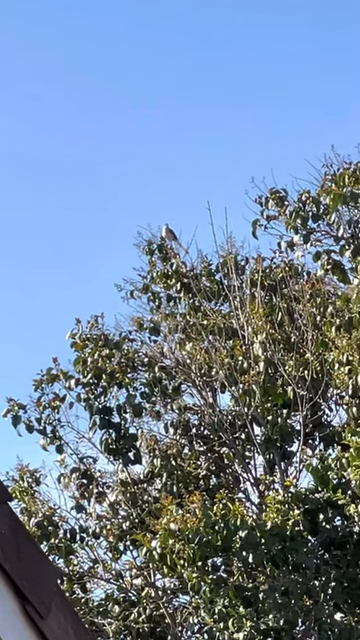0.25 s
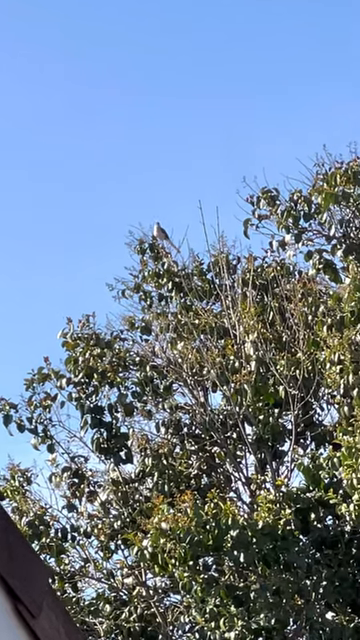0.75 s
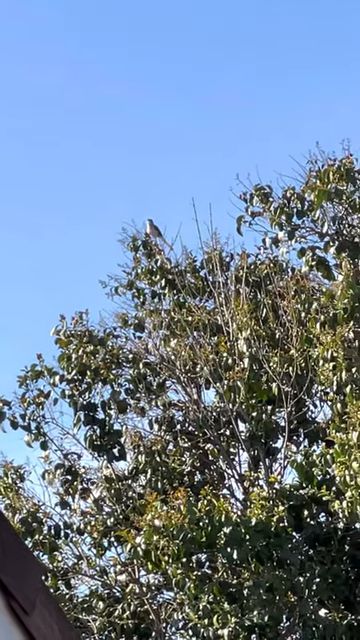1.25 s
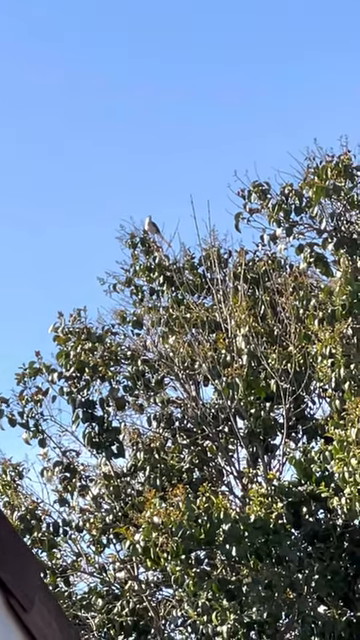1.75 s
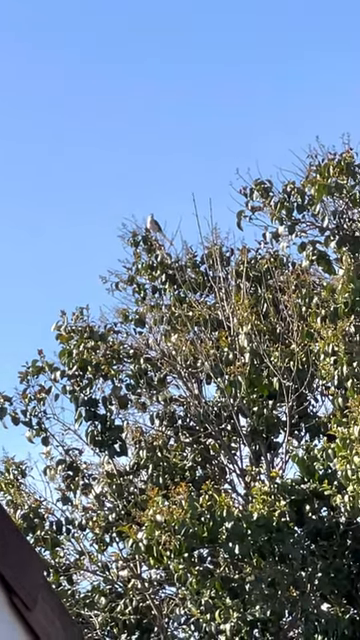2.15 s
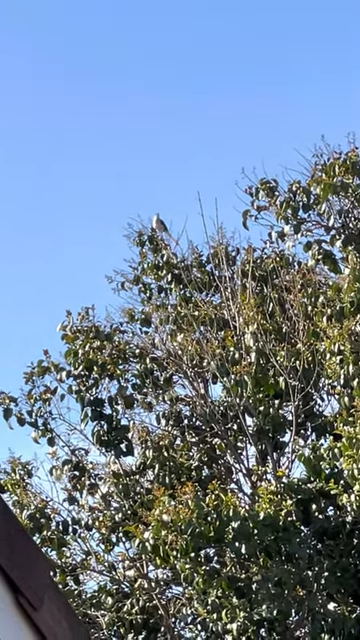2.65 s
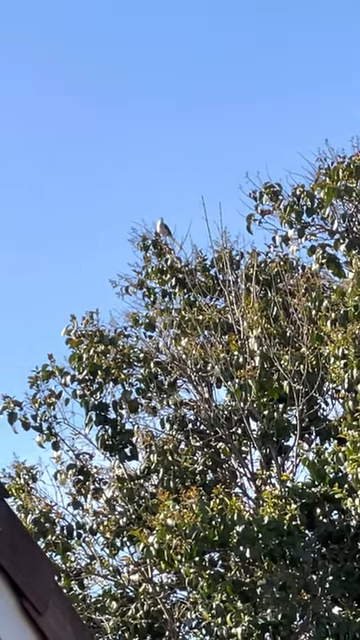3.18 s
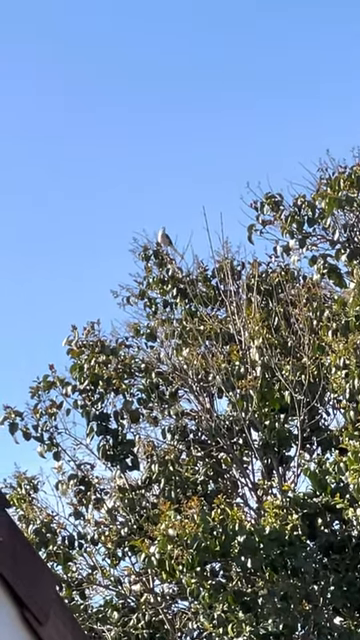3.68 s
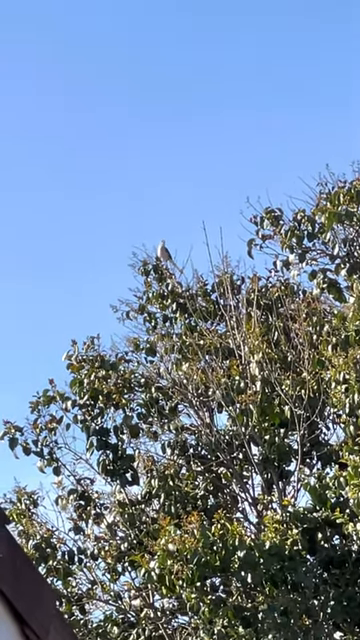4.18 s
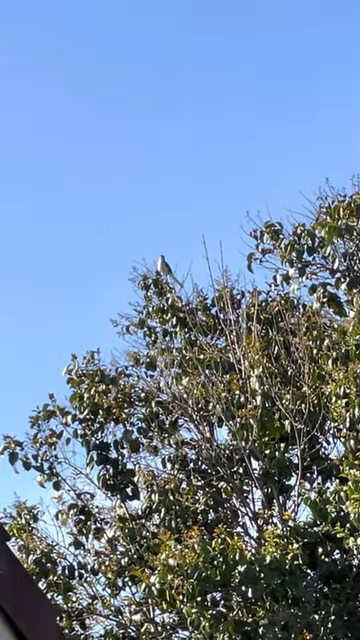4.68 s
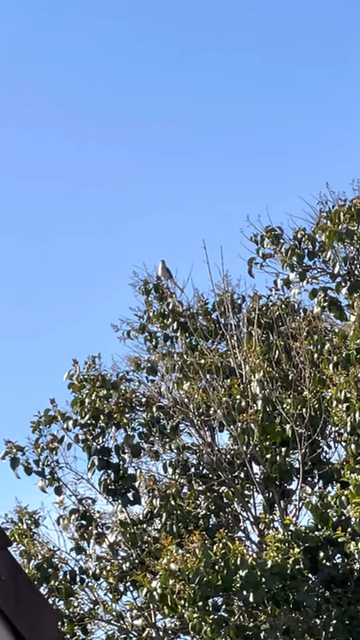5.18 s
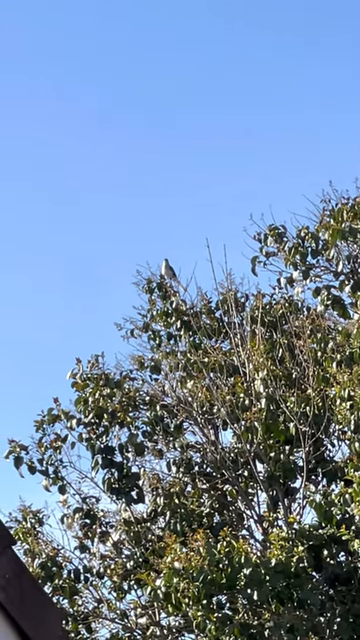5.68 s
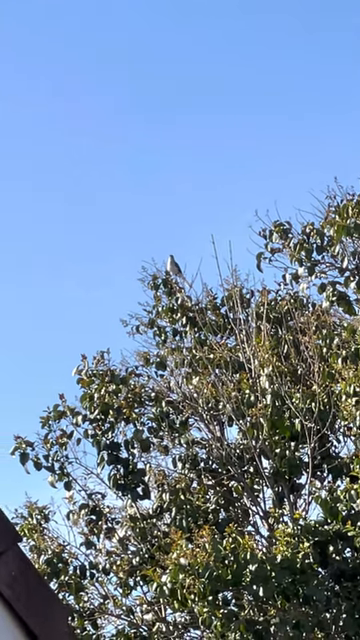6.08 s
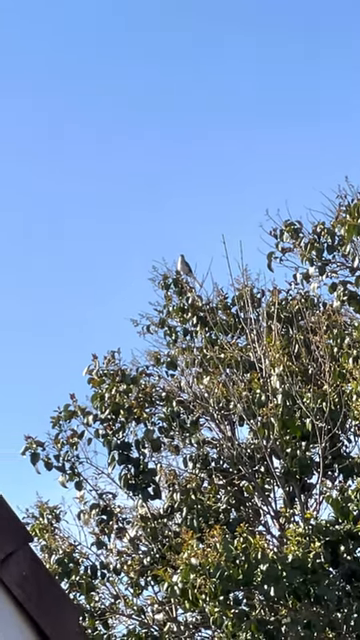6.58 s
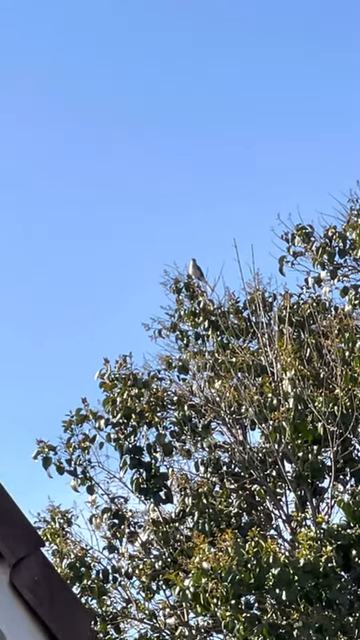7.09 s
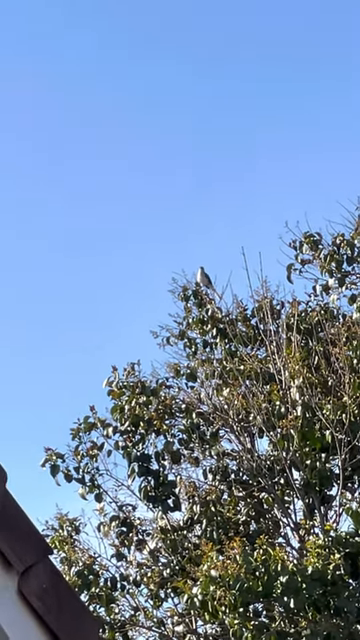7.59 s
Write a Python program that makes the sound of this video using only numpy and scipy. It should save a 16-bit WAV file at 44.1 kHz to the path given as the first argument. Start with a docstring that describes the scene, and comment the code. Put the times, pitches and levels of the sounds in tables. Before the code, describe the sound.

Outdoors, one bird buzzes nasally, mews five times with long pauses, then chucks sharply twice, while farther birds trill and a dove coos softly.

```python
"""Songbird on a treetop over a town

A near bird gives the end of one nasal buzz and a whole one, five mews that rise fast and fall, and two
harsh chucks: stacks of partials through a throat resonance, and grainy noise bands. Walls and trees answer.
A farther bird's two trills each end on a throbbing churr, others chirp as sliding whistles and a dove coos,
over filtered noise for traffic, distant birds and hush. Two close microphone ports hear the directional
sounds in step in the bass and out of step in the treble."""
import sys
import numpy as np
from scipy import signal
from scipy.fft import rfft, irfft, next_fast_len
from scipy.io import wavfile
from scipy.ndimage import map_coordinates

SR = 44100
rng = np.random.default_rng(int(sys.argv[2]) if len(sys.argv) > 2 else 0)


def file_out(sig):
    """Save sig as 16-bit WAV at sys.argv[1]."""
    # one column per channel
    cols = np.atleast_2d(sig).T
    # limit, then scale
    lim = np.clip(cols, -1, 1)
    pcm = np.round(lim * 32767).astype(np.int16)
    wavfile.write(sys.argv[1], SR, pcm)


def how_loud(loudness_db):
    """Turn decibels into a plain amplitude multiplier (0 dB gives 1, 20 dB gives 10)."""
    steps = np.asarray(loudness_db, float) / 20
    return 10 ** steps


N = 345744  # samples


def unit(x):
    """Normalisation: a signal divided by its rms has unit power."""
    return x / np.sqrt(np.mean(x ** 2) + 1e-20)


def along(points, hz):
    """Logarithmic frequency scale: (Hz, value) points are joined by lines over log frequency."""
    f, v = np.transpose(points)
    return np.interp(np.log(hz + 1), np.log(f + 1), v)


def span(rows):
    """Piecewise linear control: first sample, times, 6 ms edge fades and a curve for each column."""
    s, *cols = np.transpose(rows)
    start = round(s[0] * SR)
    t = np.arange(start, min(N, round(s[-1] * SR))) / SR
    edge = np.clip(np.minimum(t - s[0], s[-1] - t) / .006, 0, 1)
    return start, t, edge, [np.interp(t, s, c) for c in cols]


def wobble(n, rate):
    """Band-limited fluctuation: a spline through random knots, rate of them a second."""
    knots = rng.standard_normal(int(n * rate / SR) + 4)
    return map_coordinates(knots, [np.arange(n) * rate / SR])


def tone(hz):
    """Frequency modulation: phase is the running sum of frequency; a sine of rms 1."""
    return np.sqrt(2) * np.sin(2 * np.pi * (np.cumsum(hz) / SR + rng.random()))


def filtered(x, response):
    """Linear filtering: the spectrum is multiplied by a complex response of frequency."""
    m = next_fast_len(x.shape[-1] + 8192)
    spectrum = rfft(x, m) * response(np.fft.rfftfreq(m, 1 / SR))
    return irfft(spectrum, m)[..., :x.shape[-1]]


def hiss(spectrum, n):
    """Coloured noise: white noise shaped by a spectral density, then scaled to rms 1."""
    white = rng.standard_normal(n)
    return unit(filtered(white, lambda hz: how_loud(along(spectrum, hz))))


def band(hz, width_hz):
    """Narrow-band noise: a jittered carrier times a random envelope whose swings saturate; rms near 1."""
    carrier = tone(hz + .1 * width_hz * wobble(len(hz), 300))
    return carrier * 2.4 * np.tanh(wobble(len(hz), width_hz) / 2)


def throat(pitch, throat_hz, sharpness):
    """Resonance: dB that two equal second-order low-pass resonators in series give partials 2 to 5."""
    r = np.arange(2, 6)[:, None] * pitch / throat_hz
    return -20 * np.log10((1 - r ** 2) ** 2 + (r / sharpness) ** 2)


def nasal(pitch, low_db, upper_db, upper_hz, shelf, top_db, top_hz, breath):
    """Source and filter: partials without their fundamental; breath smears each into narrow noise."""
    k = np.arange(2, 28)[:, None]
    n = len(pitch)
    hz = k * pitch * (1 + 0.0022 * wobble(n, 70))
    # the open beak favours one band above partial 5
    beak_band = 1 / (1 + ((hz - upper_hz) / 500) ** 2)
    upper = (k > 5) * (beak_band + shelf / (1 + (hz / 8700) ** 30))
    top = np.exp(-((hz - top_hz) / 1300) ** 2)
    gain = how_loud(upper_db) * upper / np.linalg.norm(upper, axis=0)
    gain += how_loud(top_db + 3.5) * top / np.linalg.norm(top, axis=0)
    gain[:4] = how_loud(np.array(low_db))  # partials 2 to 5 follow the throat
    # each overtone wavers on its own
    gain[1:] *= how_loud(1.68 * np.array([wobble(n, 26.7) for _ in k[1:]]))
    share = np.clip(breath * (hz / 2500) ** 2, 0, 1)  # high partials are rougher
    share[0] *= .04  # the lowest line stays nearly a clean whistle
    rough = np.array([wobble(n, 500) for _ in k])
    sines = np.array([tone(f) for f in hz])
    partials = gain * sines * (np.sqrt(1 - share) + np.sqrt(share) * rough)
    return np.sum(partials * (hz < SR / 2.2), axis=0)


def buzzes():
    """Formant filtering: a wide throat and an open beak colour a nasal stack of partials."""
    # Nasal buzzes, the first only the fading end of one. Each row: time in seconds, pitch in Hz,
    # effort in dB, level of the treble in dB, throat resonance in Hz.
    buzz_glides = [
        [(0, 893, -63, -61, 3960), (.02, 884, -81.5, -81, 4000), (.15, 914, -100, -92, 4000)],
        [(.692, 693, -91, -88, 4400), (.706, 655, -64, -53, 4530), (.722, 753, -58.5, -48.5, 4430),
         (.745, 815, -69, -44.5, 4300), (.8, 837, -61, -48, 4000), (.868, 847, -62.5, -43.5, 3970),
         (.93, 867, -57.5, -52.5, 4100), (1.08, 881.7, -64, -55.5, 4100), (1.16, 891, -64.5, -62.5, 4097),
         (1.21, 905, -70.5, -79, 3770), (1.24, 922, -92, -91, 3794)],
    ]
    source_db, throat_q = [-18.5, -6.5, -7.5, -4], 2.07  # partials 2-5 at the syrinx; a wide throat
    out = np.zeros(N)
    for rows in buzz_glides:
        i, t, edge, (pitch, effort_db, upper_db, throat_hz) = span(rows)
        age = t - t[0]
        low_db = effort_db + np.c_[source_db] + throat(pitch, throat_hz, throat_q)
        # rough onset, clear middle, hoarse end
        breath = 0.58 * np.exp(-age / 0.027) + 0.011 + 0.15 * np.clip((age - .33) / 0.24, 0, 1)
        upper_hz = np.interp(age, (.12, .22), (5570, 5110))  # the favoured band sinks
        top_db = upper_db - 17.5 - 12 * age  # the top tires first
        voice = nasal(pitch, low_db, upper_db, upper_hz, 0.27, top_db, 12860, breath)
        out[i:i + len(t)] += edge * voice
    return out


def mews():
    """Beating of two sources: the second side of the syrinx trails in pitch and parts on the fall."""
    # Mews. Each row: start, crest, beak closed and end in seconds, treble in dB,
    # how much higher the throat opens in Hz.
    calls = [(1.369, 1.523, 1.67, 1.84, -66.5, 93), (2.061, 2.203, 2.37, 2.46, -66.5, 147),
             (3.549, 3.689, 3.917, 4.01, -68.5, -6), (4.371, 4.505, 4.65, 4.835, -67.5, -100),
             (5.053, 5.186, 5.4, 5.455, -68, -100)]
    # The shape of every mew. Each row: stage (0 start, 1 crest, 2 closed, 3 end), throat resonance in Hz
    # before the opening is added, its sharpness Q, treble in dB and top partials in dB, both re the mew.
    contour = [(0, 2550, 2.6, -25, -41.5), (.22, 2690, 0.82, -16.5, -24.5), (.5, 2920, 2.5, -2.5, -12.5),
               (.8, 2650, 3.3, -1, -11), (1, 2510, 4.2, -7.5, -12.5), (1.301, 2166, 2.4, -11.5, -14),
               (1.501, 1700, 3.9, -20, -25.5), (2, 1527, 4, -17.5, -27.5), (2.35, 1462, 4, -22, -38),
               (3.001, 1360, 4.2, -36.5, -45)]
    # Voice of each mew. Each row: time in seconds, pitch in Hz, effort in dB.
    glides = [
        [(1.37, 602, -93.5), (1.4, 639, -62.5), (1.44, 703, -60.5), (1.475, 754.7, -66.5), (1.55, 786.6, -63),
         (1.6, 764.5, -69), (1.65, 753, -72), (1.7, 706, -76), (1.75, 670, -83.5), (1.84, 642, -97)],
        [(2.06, 567.4, -81), (2.1, 648, -64.5), (2.14, 695, -61.5), (2.17, 759, -66), (2.2, 772.6, -63.5),
         (2.25, 778.6, -66), (2.29, 750, -69), (2.335, 742, -69), (2.39, 695, -76), (2.46, 645, -100)],
        [(3.55, 607, -87), (3.585, 640, -62), (3.62, 708, -63), (3.66, 772.5, -63.5), (3.7, 790.4, -64.5),
         (3.75, 797.4, -70.5), (3.8, 765, -66.5), (3.84, 754, -69.5), (3.92, 701.5, -78), (3.97, 688, -81),
         (4.01, 655, -98)],
        [(4.37, 587, -89), (4.4, 662, -63), (4.44, 718, -63), (4.48, 778.5, -62), (4.52, 786.6, -63.5),
         (4.59, 760.6, -70), (4.65, 771, -69), (4.71, 719, -74), (4.79, 678, -81), (4.835, 659, -99)],
        [(5.05, 572, -78.5), (5.09, 633, -67.5), (5.13, 686, -67), (5.16, 744, -63.5), (5.2, 779, -61),
         (5.225, 779, -66.5), (5.27, 755, -65), (5.33, 731, -70.5), (5.39, 684, -77), (5.425, 664, -85),
         (5.455, 690, -100)],
    ]
    # Source levels of partials 2 to 5 at the syrinx, in dB re effort.
    source_db = [-2, -2, -2.5, 4]
    second_lag_s, octave_db = 0.11, -22.5
    out = np.zeros(N)
    stage, *shape = np.transpose(contour)
    for (*times, db, open_hz), glide in zip(calls, glides):
        stage_times = np.interp(stage, range(len(times)), times)
        i, t, edge, curves = span(np.transpose([stage_times, stage, *shape]))
        now, throat_hz, sharpness, upper_db, top_db = curves
        s, *controls = np.transpose(glide)
        pitch, effort_db = [np.interp(t, s, c) for c in controls]
        age = t - t[0]
        throat_hz = throat_hz + open_hz * np.clip(2 * (1 - now), 0, 1)
        low_db = effort_db + np.c_[source_db] + throat(pitch, throat_hz, sharpness)
        # with the beak closed the whistle keeps its own octave
        low_db[2] = np.maximum(low_db[2], low_db[0] + octave_db)
        top_hz = np.interp(age, [.05, .25], [15000, 13000])  # the beak closes and the top band sinks
        # the voice sets in rough, clears, and frays at the end
        breath = 0.15 * np.exp(-age / 0.078) + 0.01 + 0.36 * np.clip((age - .2) / 0.059, 0, 1)
        voice = nasal(pitch, low_db, db + upper_db, 5460, 0.39, db + top_db, top_hz, breath)
        trailing = 2 * np.interp(t - second_lag_s, t, pitch)
        # heard only once the two sides drift apart on the fall
        parted = np.clip((trailing - 2 * pitch - 35) / 50, 0, 1)
        second = tone(trailing) + 0.32 * tone(4 * pitch - trailing)  # with its mirror below the main line
        out[i:i + len(t)] += edge * (voice + how_loud(low_db[0] - 4.0) * parted * second)
    return out


def chucks():
    """Noise excitation: a sinking throat band, a fixed beak band and a broad rasp burst together."""
    # Chucks. Each row: time in seconds, level in dB, stretch of time as a factor, extra rasp in dB.
    calls = [(6.595, -44.5, 1.1, -3), (7.604, -45, 1.05, 2)]
    # The shape of every chuck. Each row: age in seconds before stretching, sinking throat band in Hz,
    # its level in dB, level of the 3.7 kHz beak band in dB, treble rasp in dB before the extra.
    contour = [(-.006, 2970, -52, -36, -39), (.002, 2916, -16, -15, -18), (.01, 2820, -5, -5.5, -4),
               (0.021, 2737, 1.8, -2, -5), (.033, 2480, 1, -9, -17), (.048, 2220, -5, -22, -26.5),
               (.064, 2090, -22, -36, -38)]
    # Rasp spectrum before scaling to rms 1. Each row: frequency in Hz, density in dB per Hz.
    rasp_spectrum = [(2530, -29), (4300, -20), (5160, -1), (5540, -11), (6330, -10), (6900, -17.5),
                     (7680, -14), (9950, -9), (11300, -20), (15500, -32)]
    out = np.zeros(N)
    age, *shape = np.transpose(contour)
    for s, db, stretch, extra_db in calls:
        i, t, edge, curves = span(np.transpose([s + stretch * age, *shape]))
        throat_hz, throat_db, beak_db, rasp_db = curves
        low = how_loud(throat_db) * band(throat_hz, 739)
        beak = how_loud(beak_db) * band(3700 + 0 * t, 600)
        rasp = how_loud(rasp_db + extra_db) * hiss(rasp_spectrum, len(t))
        out[i:i + len(t)] += edge * how_loud(db) * (low + beak + rasp)
    return out


def songbird():
    """Superposition: the near bird's buzzes, mews and chucks add up."""
    return buzzes() + mews() + chucks()


def far_birds():
    """Frequency glides: trill strokes and single notes are whistles with unsteady pitch."""
    # Trills of the far bird. Each row: first stroke in seconds, number of strokes, strokes a second,
    # level in dB.
    trills = [(1.81, 9, 11.4, -68.5), (5.725, 9, 11.35, -67.5)]
    # One stroke: two slides, with a held note that starts just after the low one and lasts until the
    # high one ends. Each row: delay in seconds, length in seconds, starting pitch in Hz,
    # final pitch in Hz, level in dB re the trill.
    stroke = [(0, 0.021, 3850, 2650, 0.5), (0.051, 0.021, 6200, 5600, -4),
              (0.0062, 0.065, 5720, 5640, -9.5)]
    # A held note around the first stroke, begun before it. Columns as for the stroke.
    lead_in = [(-0.09, 0.12, 5580, 5625, -11.5)]
    # Single far notes. Each row: start in seconds, length in seconds, starting pitch in Hz,
    # final pitch in Hz, level in dB.
    single_notes = [(0.195, .07, 4520, 4160, -87), (.39, .05, 3970, 3800, -86),
                    (0.453, .1, 2610, 2540, -85), (2.37, 0.018, 2850, 4400, -61.5),
                    (2.396, 0.014, 4500, 2760, -60), (2.532, 0.029, 1864, 1890, -76),
                    (2.571, 0.0078, 3950, 2410, -63), (2.69, 0.071, 3500, 4000, -74.5),
                    (2.814, 0.024, 4520, 2920, -65), (2.999, 0.016, 3050, 3100, -77),
                    (3.0, 0.045, 7200, 7650, -95), (3.228, .043, 6600, 7250, -90),
                    (3.12, 0.031, 7430, 6700, -85.5), (3.121, .084, 3420, 3680, -75.5),
                    (3.249, 0.25, 1256, 1206, -81.5), (3.32, .027, 7570, 6340, -89),
                    (3.48, 0.042, 4330, 3520, -82), (3.66, .091, 1170, 1155, -82),
                    (3.839, 0.068, 4230, 3590, -77), (4.003, 0.044, 4020, 3810, -74),
                    (4.203, .043, 3710, 3240, -84), (4.45, 0.13, 1110, 1244, -76.5),
                    (4.914, 0.19, 2770, 2980, -83), (5.605, 0.081, 4150, 2930, -84.5),
                    (6.02, .03, 6900, 7950, -79), (7.192, 0.03, 2790, 2480, -84),
                    (7.22, 0.044, 2170, 1910, -87), (7.35, .071, 1180, 1162, -80.5)]
    # Pitch scatter of single notes, widest in the middle. Each row: pitch in Hz, scatter in Hz.
    scatter_by_pitch = [(1200, 6.9), (2000, 32), (3600, 170), (5600, 65), (7500, 90)]
    notes = [(*note, along(scatter_by_pitch, note[2])) for note in single_notes]
    for first, strokes, rate, db in trills:
        parts = [(0, part) for part in lead_in]
        parts += [(j / rate, part) for j in range(round(strokes)) for part in stroke]
        for s, (delay, length, hz0, hz1, rel_db) in parts:
            level_db = db + rel_db + rng.normal(0, 1.0)
            notes.append((first + s + delay, length, hz0, hz1, level_db, 50))
    out = np.zeros(N + SR)
    for s, length, hz0, hz1, db, scatter_hz in notes:
        u = np.linspace(0, 1, round(length * SR))
        hz = hz0 + (hz1 - hz0) * u + scatter_hz * wobble(len(u), 400)
        out[round(s * SR):][:len(u)] += how_loud(db) * np.sin(np.pi * u) ** 0.29 * tone(hz)
    return out[:N]


def churr():
    """Amplitude modulation: a whistle throbs so fast that it splits into side lines."""
    # The far bird's closing churrs. Each row: start in seconds, level in dB.
    calls = [(2.528, -66), (6.442, -64.5)]
    # The shape of each churr. Each row: age in seconds, pitch in Hz, level in dB re the call,
    # rms depth of the fast throb.
    contour = [(0, 4640, -27, 0.7), (.06, 4628, -1.5, 0.54), (0.201, 4605, -2, 0.53),
               (.29, 4670, -15.5, .3), (.52, 4675, -34, 0.5)]
    throb_hz = 239
    out = np.zeros(N)
    age, *shape = np.transpose(contour)
    for s, call_db in calls:
        i, t, edge, (hz, db, depth) = span(np.transpose([s + age, *shape]))
        n = len(t)
        throb = 1 + depth * tone(throb_hz + 70 * wobble(n, 60))
        level = how_loud(call_db + db + 3.9 * wobble(n, 42.3))
        whistle = tone(hz + 45 * depth * wobble(n, 151.3))
        out[i:i + n] += edge * level * throb * whistle
    return out


def dove():
    """Random modulation: soft coos rise briefly and sag, slightly hoarse from jitter of level and pitch."""
    # Coos. Each row: start in seconds, length in seconds, top pitch in Hz, level at the top in dB.
    coos = [(6.88, 0.47, 535.7, -64.5), (7.56, 0.15, 498, -66.5)]
    rise_share, start_ratio, sag_per_s = .22, .91, .3  # share of length, share of top pitch, fall a second
    start_db, end_db = -5, 2.5  # re the level at the top
    out = np.zeros(N)
    for s, length, top_hz, top_db in coos:
        end_hz = top_hz * (1 - sag_per_s * length)
        i, t, edge, (hz, db) = span([(s, start_ratio * top_hz, top_db + start_db),
                                     (s + rise_share * length, top_hz, top_db),
                                     (s + length, end_hz, top_db + end_db)])
        level = how_loud(db + 3.9 * wobble(len(t), 40))
        out[i:i + len(t)] += edge * level * tone(hz + 5 * wobble(len(t), 40))
    return out


def yard(x, wait):
    """Reverberation: walls and trees answer diffusely, each frequency decaying at its own speed."""
    # Decay of the yard. Each row: frequency in Hz, time to fall by 60 dB in seconds.
    decay_times = [(500, 0.16), (2500, 0.53), (6000, 0.19), (15000, 0.35)]
    hz, t, z = signal.stft(rng.standard_normal(SR), SR, nperseg=256)
    decay = how_loud(-60 * t / along(decay_times, hz)[:, None])
    tail = signal.istft(z * decay, SR, nperseg=256)[1]
    delayed = np.pad(x, (round(wait * SR), 0))
    return signal.fftconvolve(delayed, tail / np.linalg.norm(tail))[:N]


def ports(x):
    """Directional hearing: one direction reaches two ports with a phase and a level difference."""
    # Phase between the ports. Each row: frequency in Hz, lead of the left in radians.
    lead = [(300, 0), (1500, .2), (2300, .55), (5000, .7), (6700, 1.1), (9000, 2.9), (11900, 3.8),
            (13400, 4.6), (15200, 6)]
    # Level between the ports. Each row: frequency in Hz, left over right in dB.
    tilt = [(300, -3), (1400, 3.5), (2300, -0.5), (15000, 2.9)]
    side = np.array([[.5], [-.5]])
    return filtered(x, lambda hz: np.exp(1j * side * along(lead, hz)) * how_loud(side * along(tilt, hz)))


def distant_chatter():
    """Statistical superposition: a blur of distant birds is noise with a wavering level."""
    # Level of the blur. Each row: time in seconds, mean level in dB.
    blur_level = [(0, -86.5), (.7, -84.5), (1.7, -83), (2.3, -72.5), (2.9, -80.5), (3.4, -88), (4, -88.5),
                  (4.8, -79), (5.5, -92), (6.2, -96), (6.9, -104), (7.84, -81)]
    # Blur spectrum before scaling to rms 1. Each row: frequency in Hz, density in dB per Hz.
    spectrum = [(1200, -30.5), (1600, 2), (2000, -6.5), (2500, -5), (3800, -2), (4500, -13.5),
                (7000, -21.5), (8500, -46.5)]
    t = np.arange(N) / SR
    level_db = np.interp(t, *np.transpose(blur_level)) + 1.0 * wobble(N, 18)
    return how_loud(level_db) * hiss(spectrum, N)


def traffic():
    """Low-frequency noise: a rumble of slowly changing level, for both ports alike."""
    # Level of the rumble. Each row: time in seconds, level in dB.
    rumble_level = [(0.0, -49), (2.2, -53.5), (3.8, -55), (4.82, -52), (5.81, -53.5), (7.62, -52.5),
                    (7.84, -56.5)]
    # Rumble spectrum before scaling to rms 1. Each row: frequency in Hz, density in dB per Hz.
    spectrum = [(12, -47.5), (20, -10), (60, 2), (80, 5), (124, -2), (183, -12), (237, -10.5), (320, -31),
                (420, -50.5), (700, -120)]
    t = np.arange(N) / SR
    return how_loud(np.interp(t, *np.transpose(rumble_level))) * hiss(spectrum, N)


def hush():
    """Partial coherence: air and leaves are one noise shared by the ports and one opposed in them."""
    # Shared noise before scaling to rms 1. Each row: frequency in Hz, density in dB per Hz.
    shared_spectrum = [(150, -27), (250, 1), (400, -7.5), (560, -12), (810, -11), (1100, -18.5),
                       (2200, -27), (4200, -41), (8500, -47), (9600, -57.5), (12400, -55), (15600, -64.5)]
    # Opposed noise before scaling to rms 1. Each row: frequency in Hz, density in dB per Hz.
    opposed_spectrum = [(24, -80), (85, -16), (150, -5), (200, 0), (460, -2.5), (800, -2), (1800, -20),
                        (2600, -42.5), (5400, -36.5), (6700, -36.5), (9000, -30.5), (15600, -48.5)]
    mid = how_loud(-67.0 + 0.13 * wobble(N, 0.98)) * hiss(shared_spectrum, N)
    side = how_loud(-71.0) * hiss(opposed_spectrum, N) + 0.065 * mid  # leans a little to the left
    return np.array([mid + side, mid - side])


def town():
    """Superposition of background noises: traffic, directional chatter and hush."""
    return traffic() + ports(distant_chatter()) + hush()


def scene():
    """Direct and reverberant sound: the near bird is mostly direct, far birds have an echo about as strong."""
    near, far = songbird(), far_birds() + churr()
    echo = how_loud(-13.5) * yard(near, wait=0.01) + how_loud(0.0) * yard(far, wait=0.0052)
    spread = how_loud(-30.5) * yard(near, wait=.015) + how_loud(-18.5) * yard(far, wait=0.018)
    birds = ports(near + far + echo) + spread * [[1], [-1]]  # the spread is opposed between the ports
    return birds + dove() * [[1.3], [-.3]] + town()


def band_limit(x):
    """A steep low-pass at the top of the band."""
    return signal.sosfilt(signal.butter(12, 15690, fs=SR, output="sos"), x)


def record(dry):
    """Sum and difference: the half-sum of the ports is equalised and the half-difference left as it is."""
    # Gain of the half-sum. Each row: frequency in Hz, gain in dB.
    mid_gain = [(8900, 1), (9400, 2.5), (10600, 1.5), (11500, 2.5)]
    mid, side = (dry[0] + dry[1]) / 2, (dry[0] - dry[1]) / 2
    mid = filtered(mid, lambda hz: how_loud(along(mid_gain, hz)))
    return band_limit(np.array([mid + side, mid - side]))


dry = scene()
out = record(dry)
file_out(out)
```